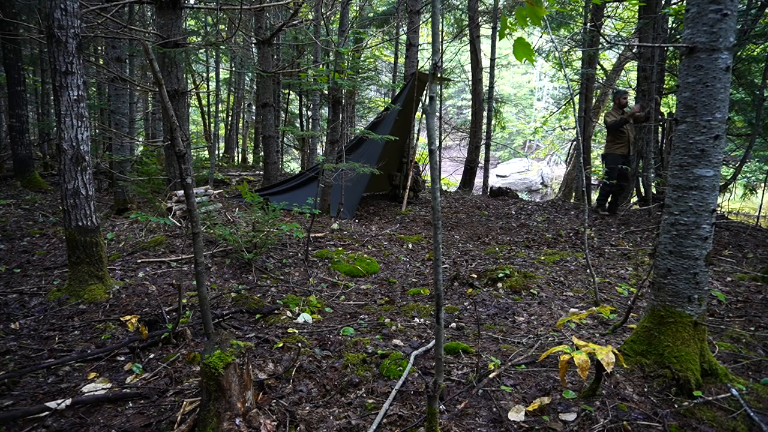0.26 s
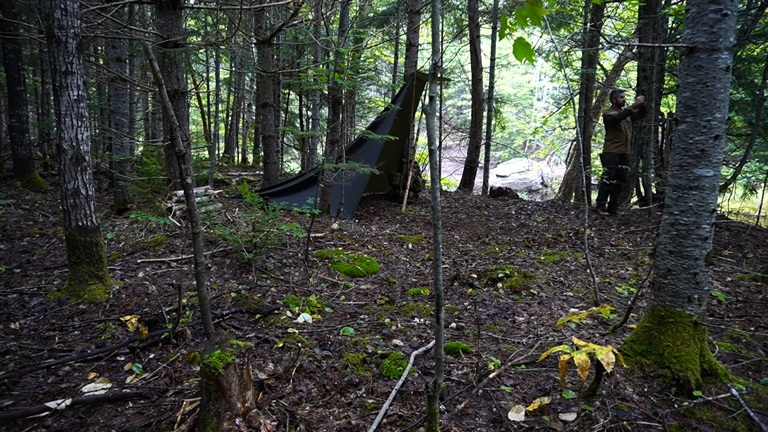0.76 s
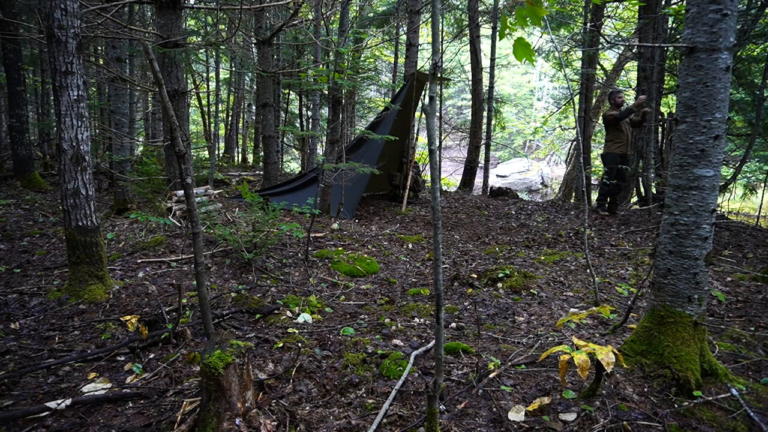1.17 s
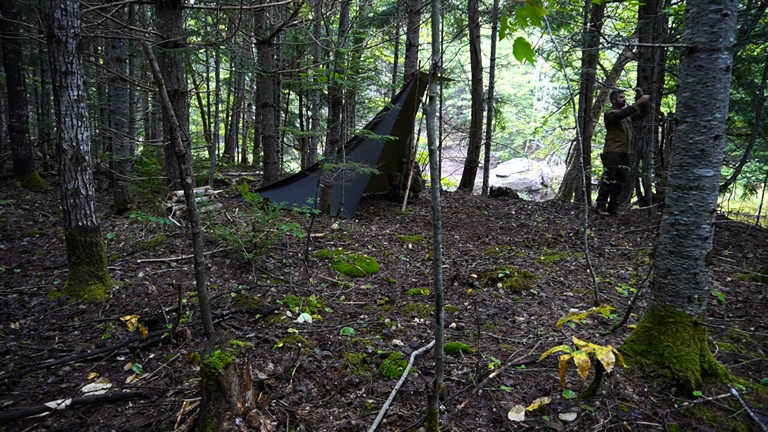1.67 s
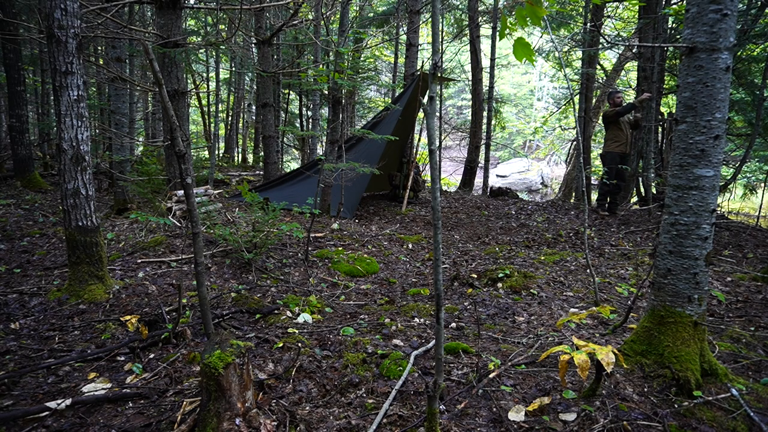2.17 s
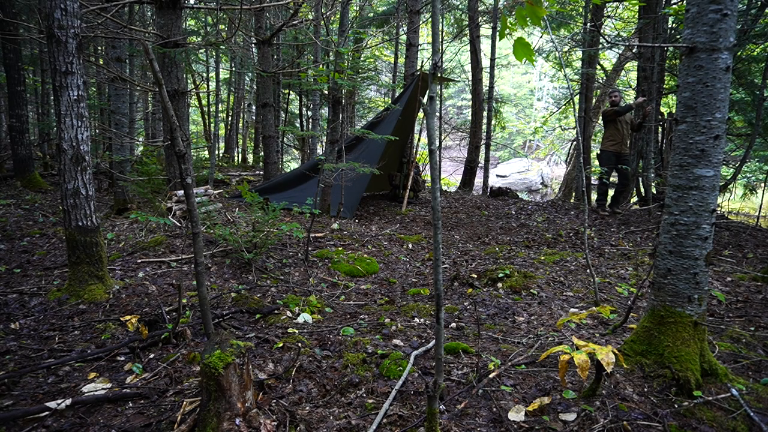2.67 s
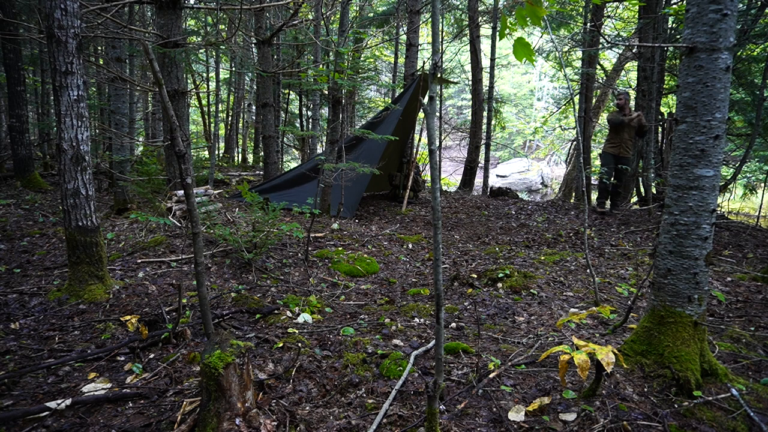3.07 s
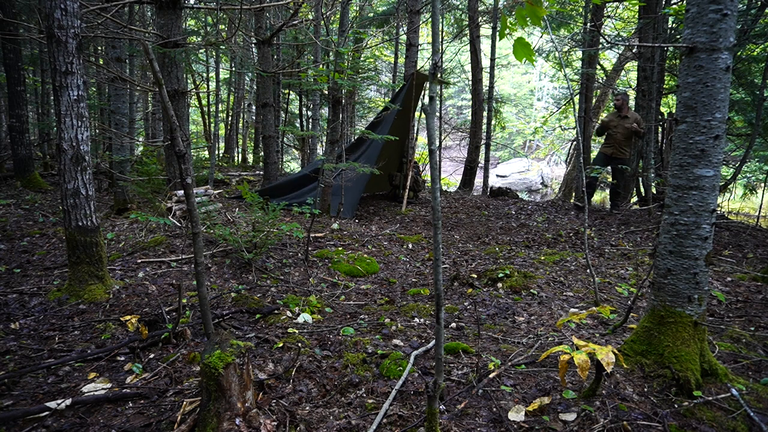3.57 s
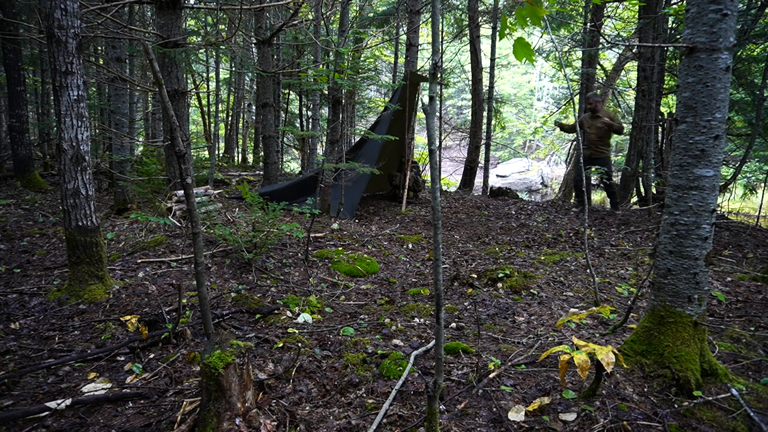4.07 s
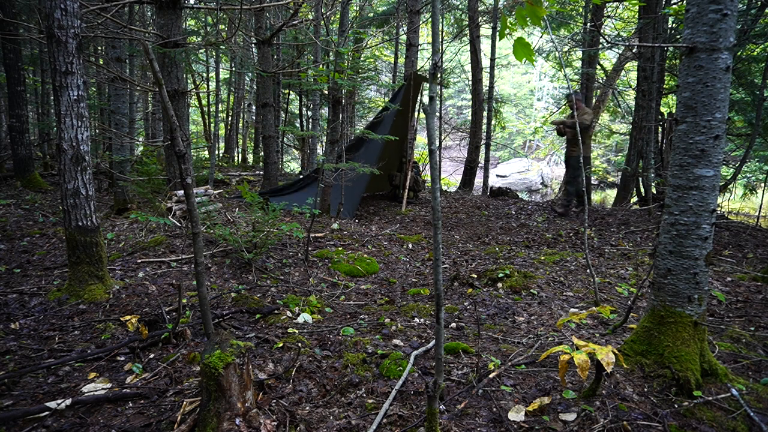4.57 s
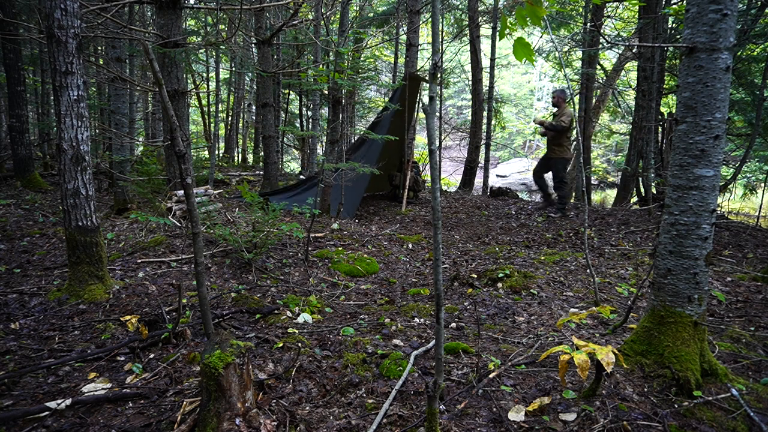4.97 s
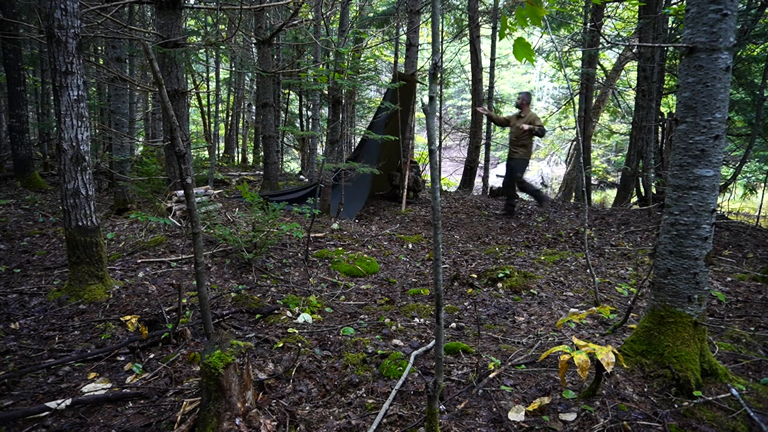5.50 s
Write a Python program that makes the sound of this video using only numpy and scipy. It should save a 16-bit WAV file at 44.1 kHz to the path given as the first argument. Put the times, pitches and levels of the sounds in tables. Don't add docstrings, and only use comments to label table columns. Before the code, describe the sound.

A quiet, wet forest heard from a microphone under a small taut cover near the ground. A faint, even hush of far rain runs throughout, with fine patter and crackle of tiny drops and barely stirred wet leaves. At 0.1 s a very heavy drip hits close overhead: a sharp crack, a short, dull drum-like thump and a bright spray. Only sparse faint ticks follow until about 1.46 s, when a light leaf tap lands. A clear plop comes at 2.08 s, then a second loud crack with a low ring at 2.27 s, trailed by small splatters around 2.45 s. At 3.44 s a deep, rounded thud sounds with little snap. Drops then thicken: a soft thump at 3.98 s, a crisp plop at 4.23 s, a crackling splash at 4.58 s, and a snappy hit with wet spatter at 4.7 s. Smaller taps continue to the end at 5.7 s.

```python
import sys
import numpy as np
from scipy import signal
from scipy.fft import rfft, irfft
from scipy.io import wavfile
from scipy.ndimage import uniform_filter1d, map_coordinates

SR = 44100
rng = np.random.default_rng(int(sys.argv[2]) if len(sys.argv) > 2 else 0)


def materialize(psi):
    bounded = np.clip(np.atleast_2d(psi).T, -1, 1)
    quanta = np.round(bounded * 32767).astype(np.int16)
    wavfile.write(sys.argv[1], SR, quanta)


def invert_db(level):
    return 10 ** (np.asarray(level, dtype=float) / 20)


N = 253134


def band(x, hz, width_hz):
    centre_hz = np.clip(hz, 20, 0.44 * SR)
    return signal.lfilter(*signal.iirpeak(centre_hz, hz / width_hz, fs=SR), x)


def curve(table):
    return invert_db(np.interp(np.arange(N) / SR, *np.transpose(table)))


def peak(x):
    return x / np.abs(x).max()


def walk(rate_hz):
    hold = int(SR / rate_hz)
    steps = np.repeat(rng.standard_normal(N // hold + 1), hold)
    return 1.3 * uniform_filter1d(uniform_filter1d(steps, hold), hold)[:N]


def add(out, start_s, sound):
    i = int(start_s * SR)
    out[i:i + len(sound)] += sound[:N - i]


def ticks(table, width, crack, lag_ms):
    out, t = np.zeros(N), np.arange(2048) / SR
    for start_s, peak_db, hz, t60_s in table:
        carrier, flicker = rng.standard_normal((2, len(t)))
        decay = np.exp(-np.log(1000) * t / max(t60_s, 0.001))
        burst = carrier * invert_db(6.5 * flicker) * decay
        burst = burst + crack * (t == 0)
        ring = band(band(burst, hz, width * hz), hz, 1.59 * width * hz)
        add(out, start_s + lag_ms / 1000, invert_db(peak_db) * peak(ring))
    return out


def hush():
    # frequency in Hz, level in dB per Hz.
    spectrum = [(12, -40), (20, 2), (55, 0), (268, -8), (1110, -8), (5000, -19.5), (6430, -20.5),
                (15700, -31)]
    # time in seconds, level in dB.
    level = [(0.0, -59), (0.19, -59.5), (0.82, -58.5), (1.26, -60), (1.52, -59.5), (4.57, -59.5),
             (4.75, -58.5), (5.74, -59.5)]
    f_hz = np.maximum(np.fft.rfftfreq(N, 1 / SR), 1)
    knot_hz, knot_db = np.transpose(spectrum)
    shape = invert_db(np.interp(np.log(f_hz), np.log(knot_hz), knot_db))
    shape[f_hz > 15850] *= 0.03
    noise = rfft(rng.standard_normal(N)) * shape
    swell_db = 0.35 * walk(3.0)
    out = 0
    for octave in np.arange(4, 15):
        share = np.clip(1 - np.abs(np.log2(f_hz) - octave), 0, 1)
        out = out + irfft(noise * share, N) * invert_db(swell_db + 0.48 * walk(13.0))
    return out / out.std() * curve(level) * invert_db(-0.56)


def patter():
    # time in seconds, level in dB.
    level = [(0, -72.5), (1.5, -70.5), (3, -72), (4, -71), (4.6, -71), (5.2, -75), (5.74, -69)]
    rate_hz, smear_s = 60, 0.0012
    out = np.zeros(N)
    for hz, db in [(450, -9.5), (1000, -3.5), (2200, -7), (4000, -5), (7000, -9)]:
        chance, size = rng.random((2, N))
        clicks = (chance < rate_hz / SR) * invert_db(np.minimum(-2.5 * np.log(size), 7))
        smear = signal.lfilter([1], [1, -np.exp(-1 / (smear_s * SR))], clicks)
        smear = smear * rng.standard_normal(N)
        grains = band(band(smear, hz, 0.61 * hz), hz, 0.97 * hz)
        out += invert_db(db) * grains / grains.std()
    return out * curve(level)


def leaves():
    # ring in Hz, width as a share of the ring,
    # first contact over crackle, lag in ms, t60 of the droplet burst in seconds.
    response = [(1300, 0.64, 47, .9, 0.0077), (1550, 0.34, 50, .7, .006), (3300, 0.29, 32, .7, 0.0091),
                (5500, 0.3, 22, .6, 0.011), (8500, 0.47, 6.8, .6, 0.009)]
    # start in seconds, plop in dB, plop in Hz, snap in dB, snap in Hz.
    near = [(0.0287, -39.5, 640, -42.5, 4300), (0.1103, -20, 965, -22, 6600),
            (1.4578, -44.5, 730, -50, 11200), (2.0783, -35.5, 1050, -35.5, 3080),
            (2.237, -45, 694, -53, 1620), (2.2704, -21, 610, -33, 7050), (2.4334, -41.5, 1140, -51, 4420),
            (2.4456, -36.5, 850, -41, 3500), (2.5085, -52, 904, -53, 3300), (3.4433, -55, 685, -44, 1550),
            (3.7982, -42.5, 1350, -45.5, 4730), (4.2287, -28, 830, -27.5, 3030),
            (4.3262, -37, 1100, -41.5, 3380), (4.7055, -34, 610, -28.5, 2600), (5.141, -45, 684, -35, 3730),
            (5.163, -37, 656, -46, 2600), (5.4828, -47.5, 1170, -50, 3320),
            (5.632, -45.5, 729, -46.5, 3240), (5.7148, -47, 1250, -46.5, 3400)]
    # start in seconds, spray in dB, spray in Hz, finer mist in dB.
    sprays = [(.0288, -47, 6340, -43), (.1105, -20, 5700, -28), (.593, -53, 5890, -58),
              (.7647, -48.5, 5640, -62), (1.0228, -40.5, 6300, -66), (1.4578, -42, 4900, -39),
              (1.703, -41.5, 6560, -61), (2.0783, -31.5, 6560, -47), (2.271, -42, 5400, -43),
              (2.4337, -46, 5140, -45), (2.4463, -47, 5000, -45), (3.1053, -45.5, 5400, -50),
              (3.277, -59, 6500, -51), (3.3245, -53, 7190, -55), (3.616, -61, 5920, -51),
              (3.7985, -46, 4800, -53), (4.0118, -46, 5760, -62), (4.228, -35, 6500, -62),
              (4.3265, -49, 6670, -57), (4.551, -52, 6800, -55), (4.572, -51.5, 5076, -48),
              (4.7061, -39, 4970, -39), (5.04, -48, 6080, -50), (5.1405, -39, 5800, -39.5),
              (5.163, -43.5, 4910, -51), (5.7154, -51, 6210, -58), (5.6316, -52, 6550, -44.5),
              (5.6627, -58, 7440, -51)]
    # start in seconds, peak in dB, ring in Hz.
    broad = [(.0727, -50.5, 2120), (.474, -52, 1050), (.703, -47.5, 1220), (1.4412, -52, 1750),
             (1.458, -35, 2440), (1.653, -49, 1070), (1.704, -51, 2290), (1.821, -48.5, 1110),
             (2.0238, -51, 1640), (2.0787, -37.5, 2700), (2.4436, -47, 2290), (2.841, -49, 1030),
             (2.8699, -50, 2030), (2.905, -45.5, 953), (3.378, -47, 1070), (3.413, -50, 930),
             (3.979, -39, 649), (4.092, -48, 895), (4.138, -50, 1550), (4.229, -32.5, 2530),
             (4.3257, -39.5, 2150), (4.5734, -45, 2190), (4.667, -45, 1130), (4.97, -48.5, 616),
             (5.04, -48.5, 1010), (5.2604, -53, 2540), (5.314, -53, 1450), (5.559, -47.5, 1100)]
    # start in seconds, peak in dB, ring in Hz.
    small = [(.073, -49, 12300), (.1795, -51.5, 8650), (.4903, -52, 8210), (0.5924, -50, 3460),
             (.6449, -53, 5350), (1.4495, -53, 3760), (1.703, -57, 4080), (1.9036, -50, 6230),
             (2.1889, -54, 5010), (2.4, -52, 3760), (2.581, -50, 3830), (2.609, -52, 8890),
             (2.827, -50, 3000), (2.8355, -52, 4920), (2.8696, -51, 9980), (3.278, -49, 3150),
             (3.4396, -52, 3410), (3.7987, -47.5, 2000), (3.88, -52, 3670), (4.012, -50, 3080),
             (4.1126, -51, 5890), (4.572, -43.5, 3280), (4.8808, -52, 8440), (4.9187, -51, 9040),
             (4.9506, -52, 3520), (5.002, -44.5, 3150), (5.4824, -52, 6440), (5.5313, -50, 2500),
             (5.6326, -53, 2690), (5.7132, -50, 2500)]
    mist_hz = 9300

    plops = [(s, db, hz) for s, db, hz, _, _ in near]
    snaps = [(s, db, hz) for s, _, _, db, hz in near]
    spray = [(s, db, hz) for s, db, hz, _ in sprays]
    mist = [(s, db, mist_hz) for s, _, _, db in sprays]
    out, columns = 0, np.transpose(response)
    for start_s, db, hz in broad + small + plops + snaps + spray + mist:
        width, crack, lag_ms, t60_s = (np.interp(hz, columns[0], column) for column in columns[1:])
        out = out + ticks([(start_s, db, hz, t60_s)], width, crack, lag_ms)
    return out


def cover():
    # start in
    # seconds, blow in dB, brightness in dB per octave, deep modes in dB, rim echo in ms.
    middle_drips = [(0.03, -44, -3, -5, 3), (0.1275, -28.5, -7, -3, 2.4), (0.198, -52, -3, 3, 3.1),
                    (3.4437, -17.5, -3, -1, 2.98), (3.53, -58, -12, 6, 3.1), (3.608, -53, -7, 14, 3.3),
                    (3.94, -44.5, 2, -5, 3.7), (3.9793, -29, -2.5, -8, 2.93), (4.092, -45, -12, 6, 3.35),
                    (4.739, -45.5, -14, 11, 3), (4.847, -47.5, 8, -8, 2.16), (4.969, -48.5, 1, -3, 2.6),
                    (5.046, -51.5, 10, -6, 4), (5.14, -46.5, -5, 0, 3.4), (5.6322, -41, 2.5, -9, 2.96)]
    # start in seconds, blow in dB, brightness in dB per octave,
    # travel in ms at 121 Hz, rim echo in ms.
    edge_drips = [
        (0.1095, -14.5, -7.5, 2.03, 2.32),
        (2.2696, -15, 6.5, 3.16, 0.83),
        (4.7031, -31, 11, 0.67, 5.28),
        (5.163, -41, 2, 3.4, 7.29),
    ]
    # frequency in Hz, level in dB,
    # t60 in seconds.
    modes = [(58, -16, 0.29), (62, 10.5, 0.017), (88, -16, 0.19), (118.7, 3, 0.096), (185, 7, 0.029),
             (254, 3.5, 0.039), (334, 2.2, 0.042), (456, -18, 0.018), (528, -5.5, 0.014), (640, -28, 0.046),
             (805, -40, 0.031)]
    middle_travel_ms = 0.06

    drips = [(s, blow, tilt, middle_travel_ms, deep, rim) for s, blow, tilt, deep, rim in middle_drips]
    for s, blow, tilt, travel, rim in edge_drips:
        deep = -13.5 + 4.3 * travel + 0.66 * tilt
        drips.append((s, blow, tilt, travel, deep, rim))

    out = np.zeros(N)
    hz, mode_db, t60_s = np.array(modes).T[:, :, None]
    low_cut = signal.butter(2, 50, "high", fs=SR, output="sos")
    for start_s, blow_db, tilt_db, travel_ms, deep_db, rim_ms in drips:
        delay_s = travel_ms / 1000 * np.sqrt(121 / hz)
        t = np.maximum(np.arange(SR // 3) / SR - delay_s, 0)
        gain = invert_db(mode_db + tilt_db * np.log2(hz / 121) + deep_db * (hz < 100))
        gain = gain * np.cos(2 * np.pi * hz * rim_ms / 1000)
        decay = np.exp(-np.log(1000) * t / t60_s)
        onset = 1 - np.exp(-t / 0.0007)
        ring = gain * np.sin(2 * np.pi * hz * t) * decay * onset
        add(out, start_s, invert_db(blow_db) * peak(signal.sosfilt(low_cut, ring.sum(axis=0))))
    return out


def cracks():
    # start in seconds, peak in dB, centre in Hz, echo in ms.
    blows = [
        (0.1109, -10.5, 3200, .665),
        (2.2717, -13.5, 2200, .71),
    ]
    echo_share = 0.8
    out = 0
    for start_s, peak_db, hz, echo_ms in blows:
        crack = ticks([(start_s, peak_db, hz, 0.005)], width=0.95, crack=33, lag_ms=0)
        echo = map_coordinates(crack, [np.arange(N) - echo_ms / 1000 * SR], order=1)
        out = out + crack - echo_share * echo
    return out


def knocks():
    # start in seconds, peak in dB, ring in Hz, t60 in seconds.
    rebounds = [(2.0792, -46, 4200, .004), (3.6, -52, 1600, .004), (3.4492, -40, 710, .012),
                (2.0798, -43.5, 460, 0.0074), (2.0792, -46, 1650, .005), (2.2745, -28, 620, .012),
                (2.2722, -24, 1650, 0.0084), (3.4445, -52, 1150, .005), (3.4470, -34, 520, 0.0062),
                (4.2348, -45, 910, .005), (4.3268, -52, 560, .005), (6.5, -44, 3700, .005),
                (4.7093, -34, 6300, .003), (4.7075, -37, 416, .006), (5.1417, -40, 12300, .006),
                (5.6322, -50, 12500, .006)]
    return ticks(rebounds, width=0.4, crack=50, lag_ms=0)


def splashes():
    # start in seconds, peak in dB, ring in Hz, t60 in seconds.
    bursts = [
        (2.4495, -50, 900, .04),
        (2.4495, -50, 3570, 0.049),
        (2.4495, -48, 7000, 0.058),
        (2.515, -53, 2400, .01),
        (4.5765, -48, 2900, 0.058),
        (4.5765, -49.5, 5800, 0.055),
        (4.5765, -58, 10500, .05),
        (4.707, -39, 1300, .018),
    ]
    return ticks(bursts, width=0.37, crack=0.1, lag_ms=0.01)


def scene():
    drops = leaves() + knocks() + splashes()
    return (cover() + cracks() + drops + patter() + hush())[None]


def band_limit(x):
    return signal.sosfilt(signal.butter(12, 16710, fs=SR, output="sos"), x)


def record(dry):
    top_cut = signal.butter(14, 16500, fs=SR, output="sos")
    return band_limit(signal.sosfilt(top_cut, dry))


dry = scene()
out = record(dry)
materialize(out)
```